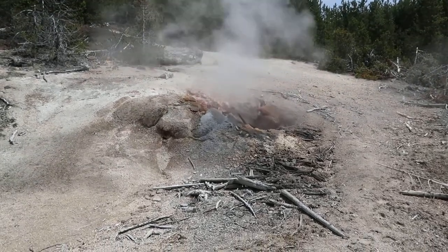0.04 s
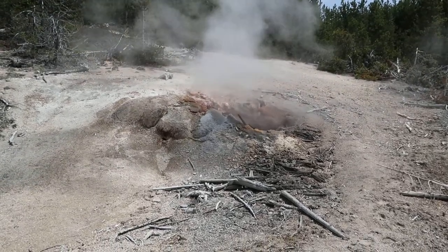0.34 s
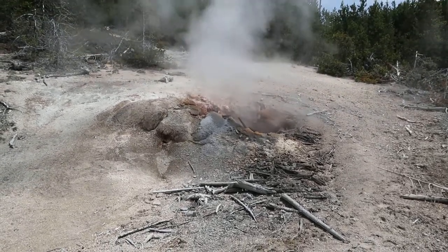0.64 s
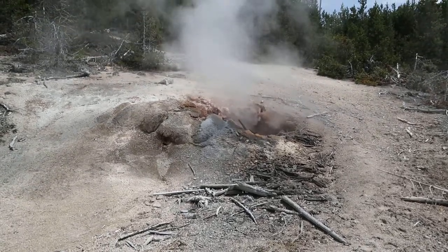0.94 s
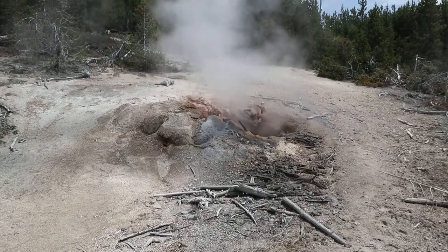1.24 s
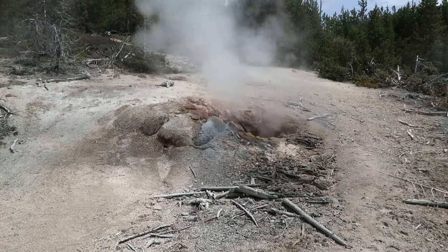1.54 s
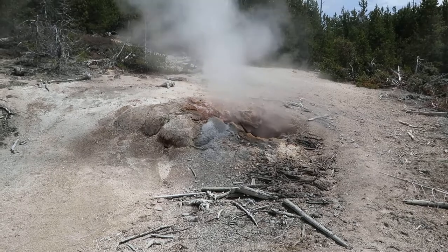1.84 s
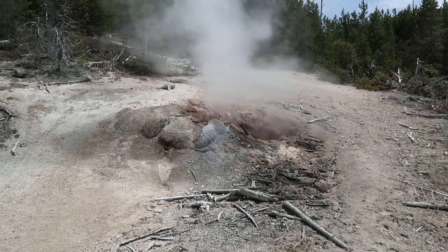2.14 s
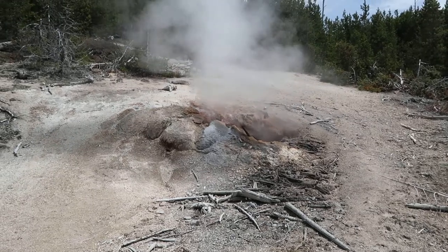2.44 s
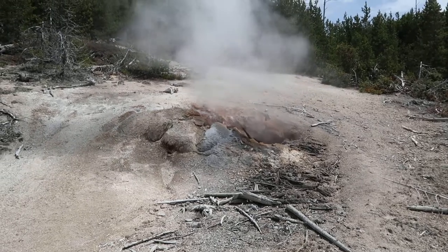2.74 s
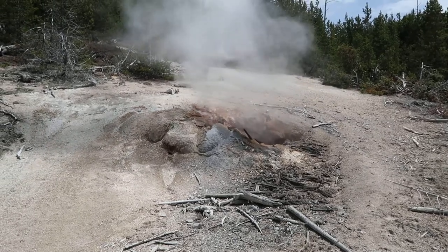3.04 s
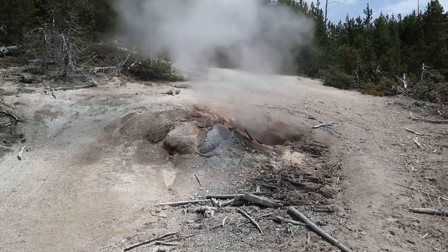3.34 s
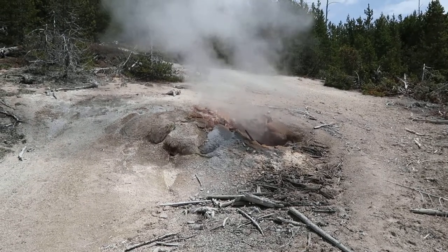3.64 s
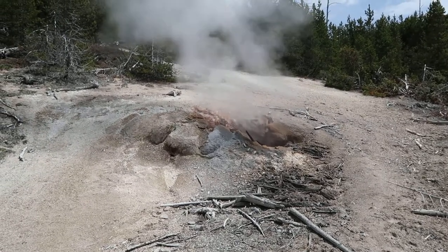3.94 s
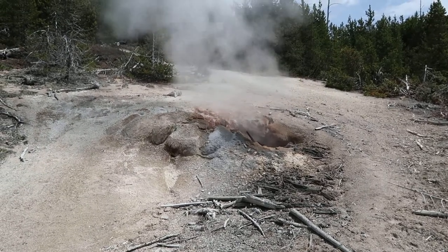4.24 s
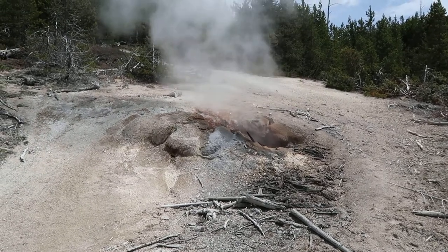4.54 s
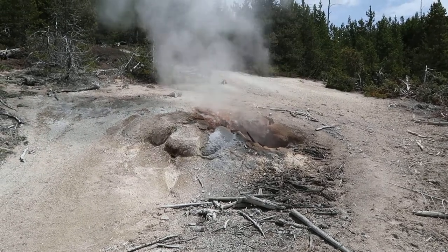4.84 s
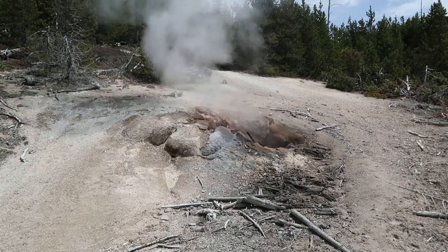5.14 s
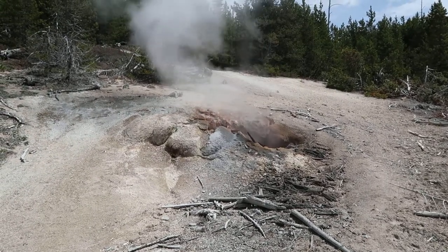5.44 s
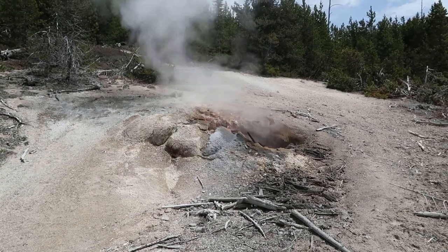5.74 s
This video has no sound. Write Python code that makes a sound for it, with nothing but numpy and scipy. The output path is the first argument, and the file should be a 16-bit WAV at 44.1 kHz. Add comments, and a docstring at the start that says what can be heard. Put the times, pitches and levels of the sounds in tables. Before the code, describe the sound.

A steam vent boils outdoors with a continuous low, surging rumble, soft gurgles, faint splashes and light wind on the microphone.

```python
"""A steam vent churns on a bare, open slope, a few metres from a hand-held camera's microphones.
Boiling water rumbles in the cavity and roars through its rocky throat; big bubbles thump, small ones
gurgle, and steam blows through a narrow gap. Surges throw up hissing spray, and water lands on rock
and gravel. Steam and trees hiss all around. Light wind bumps the microphone ports, and at first
the lens drive ticks faintly in the camera body."""
import sys
import numpy as np
from scipy import signal
from scipy.io import wavfile
from scipy.ndimage import uniform_filter1d

SR = 44100
rng = np.random.default_rng(int(sys.argv[2]) if len(sys.argv) > 2 else 0)


def transcribe(signal):
    """Save signal, clipped to [-1, 1], as a 16-bit WAV file at the path in sys.argv[1]."""
    frames = np.atleast_2d(signal).T
    limited = np.clip(frames, -1, 1)
    pcm = np.round(limited * 32767).astype(np.int16)
    wavfile.write(sys.argv[1], SR, pcm)


N = 254898
TIME = np.arange(N) / SR
OPPOSED = np.array([[1], [-1]])   # left and right in opposite polarity


def vent():
    """The boil, a few metres ahead: bursting bubbles sound the rock from deep chamber to mouth."""
    # resonances of the chamber, the cavity and the mouth: f/Hz, width/Hz, gain/dB
    chamber = [(32.6, 35, -11.5), (61, 27.5, 0.5), (93.7, 34, 3)]
    cavity = [(146.1, 73.5, 1.5), (202.5, 57, -7), (272.4, 61.5, -2), (373, 120, -14.5)]
    mouth = [(634, 300, 0)]
    boom = churn(chamber, per_s=98, spread_db=-0.5, flow_db=1.5, scatter_db=-63, span_s=0.17)
    boom *= boiling(simmer_db=-38.5, surge_db=-33, depth_share=0.94, wet_share=0)
    rumble = churn(cavity, per_s=120, spread_db=1.5, flow_db=-2.5, scatter_db=-41, span_s=0.045)
    rumble *= boiling(simmer_db=-36, surge_db=-32.5, depth_share=-0.04, wet_share=0)
    hollow = churn(mouth, per_s=300, spread_db=2.5, flow_db=-3, scatter_db=-24, span_s=0.12)
    hollow *= boiling(simmer_db=-50.5, surge_db=-53.5, depth_share=0.64, wet_share=2)
    roar = throat() * boiling(simmer_db=-48.5, surge_db=-46, depth_share=-0.15, wet_share=0)
    return boom + rumble + panned(roar + hollow, pan_db=-0.7)


def throat():
    """The throat's resonances slide together as water rises and sinks in it."""
    # resonances of the throat at rest: f/Hz, width/Hz, gain/dB
    modes = [(841.5, 148, 1), (939, 110, -2), (1047, 175, -12.5)]
    # the throat's pitch as the water moves: t/s, f/Hz
    pitch_curve = [(0, 875), (.25, 831), (.42, 931), (.7, 841), (.97, 897), (1.2, 840.6), (1.66, 884.3),
                   (1.92, 800.3), (2.25, 865), (2.39, 832), (3.05, 881), (3.7, 880.6), (3.9, 835.6),
                   (4.4, 884.3), (5.17, 833.7), (5.35, 891), (5.5, 836), (5.78, 830)]
    rest_hz, wobble_hz = 860.7, 21.91
    pitch_hz, = in_time(pitch_curve)
    speed = (pitch_hz + wobble_hz * drift(per_s=11.82)) / rest_hz
    at_rest = churn(modes, per_s=300, spread_db=3, flow_db=-2, scatter_db=-34, span_s=0.075)
    mirrored = np.hstack([at_rest, at_rest[:, ::-1]])   # long enough for any speed up to two
    return np.array([np.interp(np.cumsum(speed), np.arange(2 * N), side) for side in mirrored])


def boiling(simmer_db, surge_db, depth_share, wet_share):
    """Gain of one voice of the boil: a simmer, plus surges weighted by their depth and wetness."""
    # the boil wells up: t/s, length/s, strength/dB, depth/dB, wetness/dB
    surges = [(0.0, 0.024, 2, -1.5, 6), (0.216, 0.051, -3.5, 2, 2), (0.33, 0.14, -1, 1, 2.5),
              (0.521, 0.19, -5, -5.5, 6), (0.732, 0.19, -3, -0.5, 3), (0.927, 0.14, -6, 3.5, -1),
              (1.286, 0.13, -5.5, 0, 0), (1.42, 0.17, -1, -2, 4), (1.704, 0.11, 0, -4, 5.5),
              (1.799, 0.066, 3.5, -6.5, 5.5), (1.875, 0.092, 1, 2, -0.5), (2.237, 0.074, -7.5, 4, 1),
              (2.288, 0.19, 1, -4, 3), (2.579, 0.1, -0.5, 5.5, -13), (2.736, 0.05, 4.5, -3.5, 3),
              (2.833, 0.11, -2.5, 0, 1.5), (3.022, 0.067, -11, -24, 12), (3.172, 0.19, -0.5, -13, 4),
              (3.455, 0.069, -4, 8, -7), (3.605, 0.15, -4, 0, 3), (3.816, 0.12, -1, -1.5, 3),
              (4.152, 0.18, -3, -1, 3), (4.394, 0.12, -5.5, 1, -5), (4.678, 0.14, -2, -3, -11),
              (4.805, 0.18, 1.5, -3.5, 3.5), (5.038, 0.028, -2.5, 9, -7), (5.158, 0.23, 0.5, -13, 6.5),
              (5.461, 0.055, -12, 14.5, -5), (5.672, 0.12, -1.5, 2, -11), (5.756, 0.059, 1, -3, -5)]
    # the simmer slackens briefly: t/s, half width/s, level change/dB
    lulls = [(1.22, .13, -0.5), (2.14, .09, -2), (4.08, 0.043, -4), (4.58, 0.031, -3.5), (5.6, 0.047, -2.5)]
    weighted = [(s, length_s, surge_db + db + depth_share * depth_db + wet_share * wet_db)
                for s, length_s, db, depth_db, wet_db in surges]
    lull_db = sum(db * np.exp(-((TIME - s) / width_s) ** 2) for s, width_s, db in lulls)
    return np.hypot(from_db(simmer_db + lull_db), swells(weighted, attack_s=0.046, release_s=0.053))


def churn(modes, per_s, spread_db, flow_db, scatter_db, span_s):
    """Bursts and turbulent flow drive broad resonances; the slope scatters a little to the sides."""
    direct, scattered = 0, 0
    for hz, width, db in modes:
        edges_hz = hz - width / 2, hz + width / 2
        drive = collapses(per_s, spread_db) + from_db(flow_db) * rng.standard_normal(N)
        direct += from_db(db) * band(drive, *edges_hz)
        scattered += from_db(db) * band(rng.standard_normal(N), *edges_hz)
    return levelled(direct, span_s) + from_db(scatter_db) * rms_one(scattered) * OPPOSED


def collapses(per_s, spread_db):
    """Bubbles and drops burst at random, as clicks of uneven size; rms one."""
    sizes = from_db(spread_db * np.minimum(rng.exponential(1, N), 4))
    signs = rng.choice([-1, 1], N)
    return rms_one(sizes * signs * (rng.random(N) < per_s / SR))


def thumps(rise_s):
    """A large bubble bursts underground: its tone swells and dies within a few cycles."""
    # large bubbles: t/s, level/dB, f/Hz
    bubbles = [(0.332, -21, 122), (1.527, -22, 140), (1.825, -21, 211), (2.424, -13, 127), (2.619, -17, 85),
               (3.501, -21.5, 112), (3.852, -19.5, 89.8), (3.958, -23, 131), (5.059, -19.5, 77.7),
               (5.206, -20, 76), (5.593, -19, 55.4)]
    out = np.zeros(N)
    for s, db, hz in bubbles:
        age = np.maximum(TIME - s, 0)
        envelope = (age / rise_s * np.exp(1 - age / rise_s)) ** 2
        out += from_db(db) * envelope * np.sin(2 * np.pi * hz * age)
    return out


def gurgles(rise_cycles, glide):
    """A bubble rings in the pool, its pitch rising as it nears the surface."""
    # single bubbles: t/s, level/dB, starting f/Hz
    bubbles = [(0.584, -26, 267), (0.654, -31, 279), (0.922, -29.5, 300), (1.176, -32, 290.5),
               (1.290, -25.5, 287), (1.393, -34, 279), (1.738, -24.5, 274), (1.818, -32, 757),
               (1.989, -44.5, 684), (2.677, -28, 289), (2.991, -39, 1150), (3.471, -25, 295),
               (3.925, -33, 287), (4.415, -30.5, 271), (4.486, -36.5, 510), (4.507, -40, 588),
               (5.766, -29, 730)]
    out = np.zeros(N)
    for s, db, hz in bubbles:
        turns = np.maximum(TIME - s, 0) * hz
        age = turns / rise_cycles
        phase = 2 * np.pi * turns * (1 + glide * np.tanh(age / 4))
        out += from_db(db) * age * np.exp(1 - age) * np.sin(phase)
    return out


def steam_gap():
    """A thin, hollow jet of steam blows through a narrow gap and sinks early to a faint flow."""
    # strength of the flow: t/s, level/dB
    flow = [(0, -60), (.25, -56.5), (.42, -51.5), (.7, -53.5), (1.1, -63), (1.3, -64), (1.5, -54.5),
            (1.9, -56), (2.1, -65)]
    # resonances of the gap: f/Hz, width/Hz, gain/dB
    modes = [(1150, 240, -4), (2410, 360, -9.5)]
    flow_db, = in_time(flow)
    jet = churn(modes, per_s=280, spread_db=4, flow_db=4.5, scatter_db=-24, span_s=0.062)
    return from_db(flow_db) * jet


def water():
    """The boil splashes at the mouth; jets throw up coarse spray, fine mist and a patter of drops."""
    # jets of spray: peak t/s, rise/s, fall/s, coarse spray level/dB, mist level/dB
    jets = [(0.272, 0.032, 0.05, -59, -56.5), (0.43, 0.06, 0.08, -63, -65), (2.427, 0.056, 0.044, -54, -59),
            (3.215, 0.05, 0.14, -58, -63), (3.332, 0.029, 0.02, -52, -61.5), (4.3, 0.039, 0.11, -60.5, -68),
            (5.24, 0.055, 0.11, -56, -62.5), (5.49, 0.064, 0.052, -60.3, -63.5)]
    # resonances of the splashing water: f/Hz, width/Hz, gain/dB
    splash_modes = [(1353, 480, 0.5), (1880, 295, -1.5), (2316, 330, -10.5), (2757, 310, -4.5),
                    (3290, 880, -14.5), (4720, 460, -18.5)]
    # spectra of the coarse spray and the fine mist: f/Hz, relative density/dB
    spray_spectrum = [(1500, -15), (2400, 10), (2900, 7), (3900, 7.5), (5000, -3), (7000, -21),
                      (12000, -28)]
    mist_spectrum = [(1200, 1), (2200, 4.5), (3500, 2.5), (5000, -1), (7000, -2.5), (10000, -7.5),
                     (13000, -9), (16000, -27)]
    jet_splash_db, drops_db = -1, -14.5   # relative to the coarse spray
    coarse = puffs([(s, rise_s, fall_s, db) for s, rise_s, fall_s, db, _ in jets])
    fine = puffs([(s, rise_s, fall_s, db) for s, rise_s, fall_s, _, db in jets])
    splashing = boiling(simmer_db=-58.5, surge_db=-61, depth_share=1, wet_share=1.5)
    spraying = boiling(simmer_db=-66, surge_db=-81, depth_share=-0.5, wet_share=-0.5)
    misting = boiling(simmer_db=-74.5, surge_db=-81, depth_share=2, wet_share=4)
    splash = churn(splash_modes, per_s=400, spread_db=6, flow_db=2, scatter_db=-18, span_s=0.081)
    splash *= np.hypot(splashing, from_db(jet_splash_db) * coarse)
    spray = hiss(spray_spectrum, correlation=0.76, flicker_db=2.5)
    mist = np.hypot(misting, fine) * hiss(mist_spectrum, correlation=0.7, flicker_db=1.5)
    drops = from_db(drops_db) * rms_one(band(collapses(per_s=690, spread_db=-0.5), 3700, 6800))
    return panned(splash, pan_db=-2.5) + np.hypot(spraying, coarse) * (spray + drops) + mist


def slaps(spatter_db, low_hz, high_hz):
    """A gob of water lands on rock with a round smack and a short spatter, and rings briefly."""
    # gobs: t/s, peak level/dB, left minus right/dB, spatter decay/s, brightness/(dB per octave)
    gobs = [(2.2676, -28, -2, 0.0036, 2), (2.3545, -36, 0, .005, 0), (4.336, -38, 0, 0.0054, 10),
            (5.6233, -35, 4, 0.0084, -2)]
    # resonances of a slap: f/Hz, gain/dB, t60/s
    modes = [(930, -2, 0.011), (1129, 8, 0.006), (1495, 7, 0.014), (1680, 4, 0.012), (1900, 0.5, 0.036),
             (2440, -8, 0.01), (2610, 1, 0.033)]
    out = 0
    for s, db, pan_db, spatter_s, bright_db in gobs:
        spatter = from_db(spatter_db) * noise_burst(s, spatter_s)
        blow = band(clicks_at([(s, 0)]) + spatter, low_hz, high_hz)
        rings = sum(from_db(mode_db + bright_db * np.log2(hz / low_hz)) * ring(blow, hz, t60)
                    for hz, mode_db, t60 in modes)
        slap = band(rings, low_hz, high_hz)
        out += panned(from_db(db) * slap / np.abs(slap).max(), pan_db)
    return out


def stray_drops(decay_s, spread):
    """Each drop breaks up on the gravel in a tiny burst around its own pitch."""
    # larger drops: t/s, peak level/dB, f/Hz
    drops = [(2.035, -60, 11000), (2.80, -55, 5700), (2.885, -54, 7760), (3.585, -57, 9000),
             (4.276, -54, 6650), (5.247, -51, 5800), (5.572, -55, 6450)]
    out = 0
    for s, db, hz in drops:
        tick = band(noise_burst(s, decay_s), hz / (1 + spread), hz * (1 + spread))
        out += from_db(db) * tick / np.abs(tick).max()
    return out


def wind(gain_db, heave_db):
    """Gusts flutter at each microphone port separately; large, slow eddies heave at both alike."""
    # gusts at the ports: t/s, length/s, relative level/dB
    gusts = [(2.36, 0.22, -54), (2.57, 0.23, -40.5), (2.98, 0.3, -48), (3.48, 0.15, -50),
             (3.83, 0.054, -47), (4.05, 0.048, -37), (4.27, 0.2, -45), (4.74, 0.37, -43),
             (5.2, 0.21, -40.5), (5.56, 0.071, -37), (5.68, 0.12, -53)]
    # the breeze between gusts slowly freshens: t/s, relative level/dB
    breeze = [(0, -92), (2.0, -72), (5.78, -58)]
    # strong eddies hit one port harder: t/s, peak level/dB, width/s, left minus right/dB
    buffets = [(2.614, -24, 0.0016, -32), (2.675, -22, 0.0027, 22), (3.523, -12.5, 0.0021, -16.5),
               (5.35, -18, 0.0018, 24), (5.599, -21, 0.0017, -11)]
    breeze_db, = in_time(breeze)
    blowing = np.hypot(from_db(breeze_db), swells(gusts, attack_s=0.044, release_s=0.043))
    flutter = [levelled(band(rng.standard_normal(N), 65, 190), span_s=0.084) for port in "LR"]
    heave = from_db(heave_db) * levelled(band(rng.standard_normal(N), 23.4, 73), span_s=0.23)
    out = from_db(gain_db) * blowing * (np.array(flutter) + heave)
    for s, db, width_s, pan_db in buffets:
        away = (TIME - s) / width_s
        pressure_swing = (1 - 2 * away ** 2) * np.exp(-away ** 2)
        out += panned(from_db(db - abs(pan_db) / 2) * pressure_swing, pan_db)
    return out


def camera():
    """Lens steps rock the body, pushing the microphones in opposite senses; one dry tick stands alone."""
    from_s, to_s, frames_per_s, step_chance = 0.041, 1.85, 60, 0.5   # while the lens settles
    lens_db, scatter_db, tick_s, tick_db = -48, 4, 1.4233, -35
    frames = np.arange(from_s, N / SR, 1 / frames_per_s)
    stepping = (rng.random(len(frames)) < step_chance) & (frames < to_s)
    step_db = lens_db + scatter_db * rng.standard_normal(len(frames))
    steps = ring(clicks_at(zip(frames[stepping], step_db[stepping])), hz=4060, t60=0.018)
    tick = band(clicks_at([(tick_s, tick_db)]), 3000, 17200)
    return steps * OPPOSED + tick


def ambience(level_db):
    """Steam and trees hiss steadily all around the microphones."""
    # spectrum of the hiss: f/Hz, relative density/dB
    spectrum = [(120, -33), (200, -7.5), (262, 1), (459, -5.5), (530, -13.5), (1170, -12.5), (4160, -21.5),
                (11400, -34), (13500, -40), (15000, -62)]
    return from_db(level_db) * hiss(spectrum, correlation=0.026, flicker_db=1)


def hiss(spectrum, correlation, flicker_db):
    """Half-octave bands of stereo noise, each flickering on its own; rms one."""
    hz, density_db = np.transpose(spectrum)
    edges_hz = 177 * 2 ** np.arange(0, 6.6, .5)
    out, white = 0, rng.standard_normal((2, 2, N))
    for k, (low, high) in enumerate(zip(edges_hz, edges_hz[1:])):
        db = np.interp(np.log(low * high) / 2, np.log(hz), density_db)
        mid, side = band(white[k % 2], low, high) * from_db(db + flicker_db * drift(per_s=28))
        out += np.sqrt(1 + correlation) * mid + np.sqrt(1 - correlation) * side * OPPOSED
    return rms_one(out)


def swells(rows, attack_s, release_s):
    """Gain of (t/s, length/s, level/dB) events that rise, hold and fall; they add in power."""
    power = np.zeros(N)
    for s, length_s, db in rows:
        rise = np.clip((TIME - s) / attack_s + .5, 0, 1)
        fall = np.clip((s + length_s - TIME) / release_s + .5, 0, 1)
        power += from_db(db) ** 2 * rise * fall
    return np.sqrt(power)


def puffs(rows):
    """Gain of (peak t/s, rise/s, fall/s, level/dB) events with rounded tops; they add in power."""
    power = np.zeros(N)
    for s, rise_s, fall_s, db in rows:
        away = np.abs(TIME - s) / np.where(TIME < s, rise_s, fall_s)
        power += (from_db(db) / np.cosh(np.minimum(away, 20))) ** 2
    return np.sqrt(power)


def noise_burst(s, decay_s):
    """White noise that starts at once and dies away."""
    return rng.standard_normal(N) * (TIME >= s) * np.exp(-np.minimum(np.abs(TIME - s) / decay_s, 50))


def clicks_at(rows):
    """One click for each (t/s, level/dB) row."""
    out = np.zeros(N)
    for s, db in rows:
        out[int(s * SR)] += from_db(db)
    return out


def ring(clicks, hz, t60):
    """A unit click sets a sine of height one ringing."""
    r, w = from_db(-60 / (t60 * SR)), 2 * np.pi * hz / SR
    return signal.lfilter([0, np.sin(w)], [1, -2 * r * np.cos(w), r * r], clicks + 1e-18)


def band(x, low_hz, high_hz):
    """Band-pass with a peak gain of one."""
    return signal.sosfilt(signal.butter(2, [low_hz, high_hz], "band", fs=SR, output="sos"), x + 1e-18)


def drift(per_s):
    """A slow random wander; rms one."""
    hop, settling = 40, 2000
    r = np.exp(-2 * np.pi * per_s * hop / SR)
    white = rng.standard_normal(N // hop + settling + 2)
    slow = signal.lfilter([1], [1, -2 * r, r * r], white)[settling:]
    return np.interp(np.arange(N) / hop, np.arange(len(slow)), rms_one(slow))


def levelled(x, span_s):
    """Hold the level steady over spans longer than span_s, keeping the grain."""
    size = int(span_s * SR)
    power = uniform_filter1d(uniform_filter1d(x * x, size), size)
    return x / np.sqrt(np.abs(power) + 1e-12)


def in_time(rows):
    """Each column of a curve, at every sample."""
    s, *columns = np.transpose(rows)
    return [np.interp(TIME, s, c) for c in columns]


def panned(x, pan_db):
    """Place a sound between the microphones; positive is left."""
    return x * from_db([[pan_db / 2], [-pan_db / 2]])


def rms_one(x):
    """Scale to an rms of one."""
    return x / np.sqrt(np.mean(x ** 2) + 1e-20)


def from_db(db):
    """Decibels to gain."""
    return 10 ** (np.asarray(db) / 20)


def scene():
    """The vent a few metres ahead, hiss all around, wind and ticks right at the microphones."""
    air = ambience(level_db=-54)
    boil = vent() + thumps(rise_s=0.0057) + gurgles(rise_cycles=2.05, glide=0.04)
    spouting = steam_gap() + water()
    gobs = slaps(spatter_db=-22.5, low_hz=617, high_hz=3270)
    drops = stray_drops(decay_s=0.0029, spread=0.25)
    return boil + spouting + gobs + drops + air + wind(gain_db=0.5, heave_db=0.99) + camera()


def record(dry):
    """The top treble is cut steeply."""
    cutoff_hz = 14900
    return signal.sosfilt(signal.ellip(10, .1, 80, cutoff_hz, fs=SR, output="sos"), dry)


dry = scene()
out = record(dry)
transcribe(out)
```